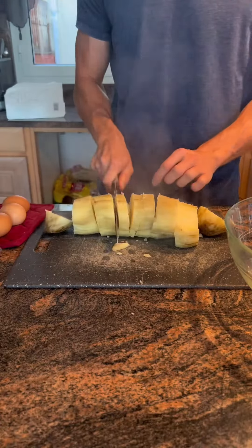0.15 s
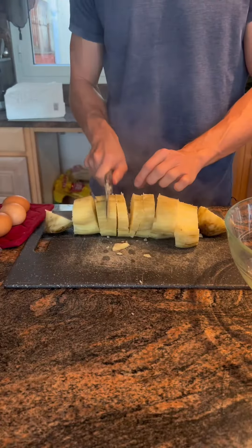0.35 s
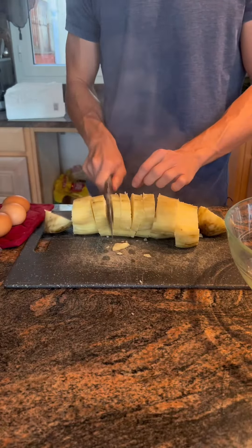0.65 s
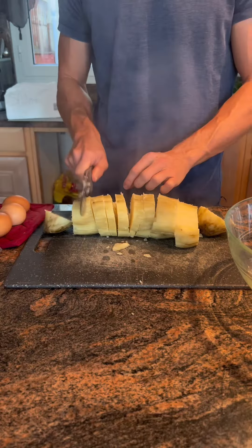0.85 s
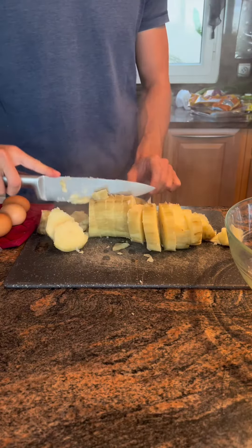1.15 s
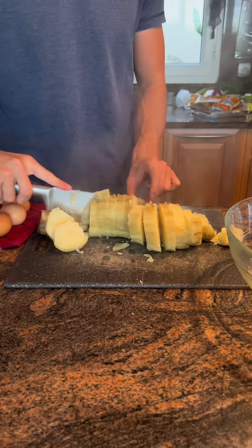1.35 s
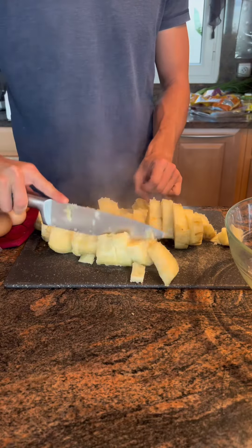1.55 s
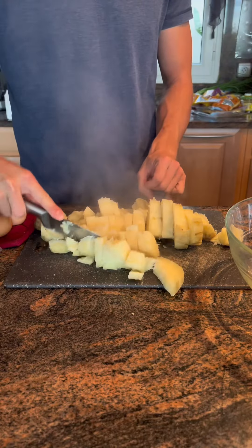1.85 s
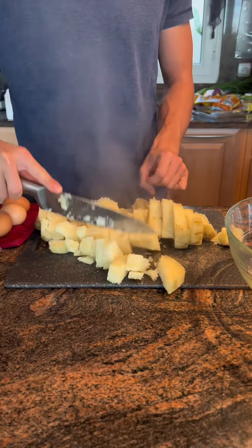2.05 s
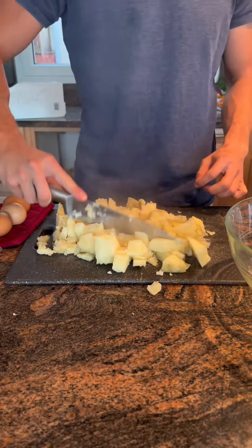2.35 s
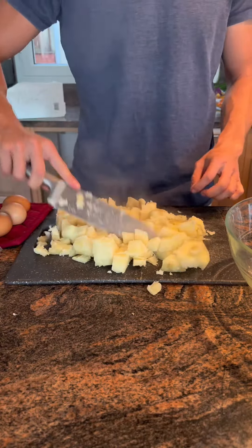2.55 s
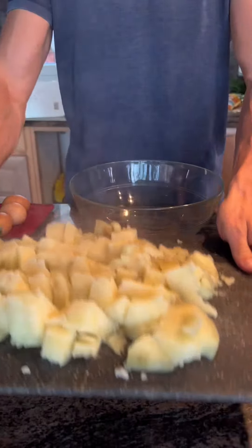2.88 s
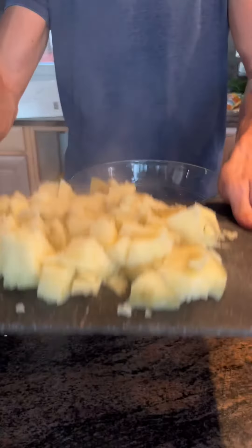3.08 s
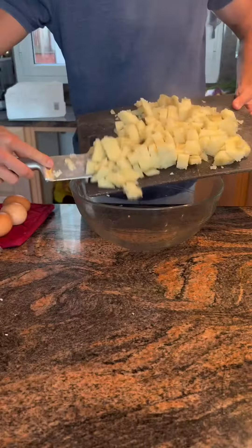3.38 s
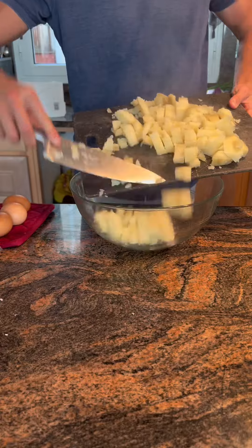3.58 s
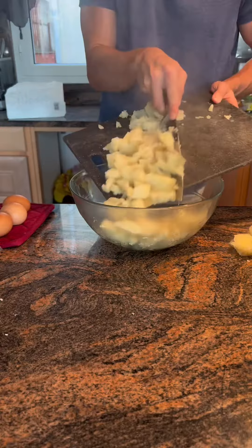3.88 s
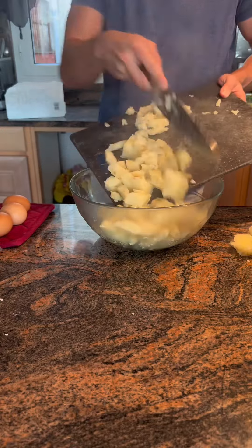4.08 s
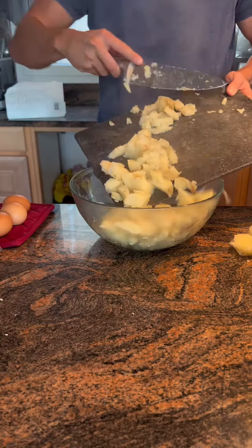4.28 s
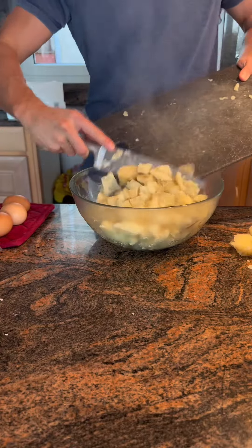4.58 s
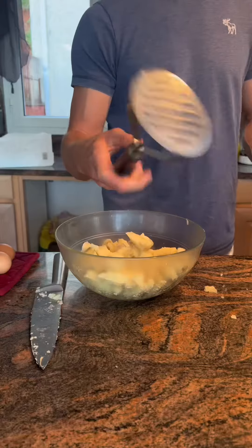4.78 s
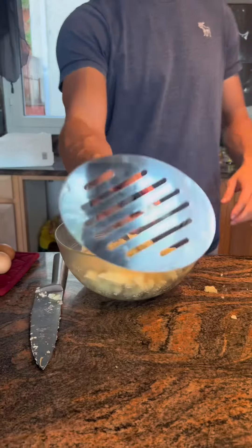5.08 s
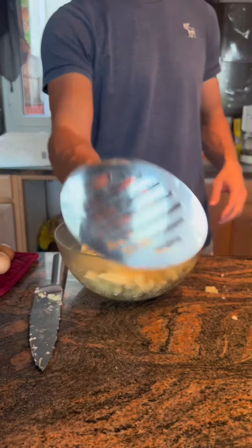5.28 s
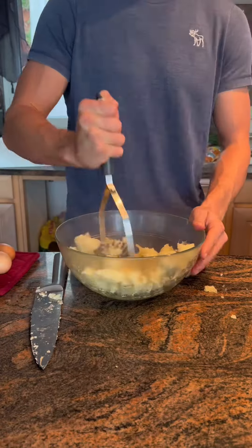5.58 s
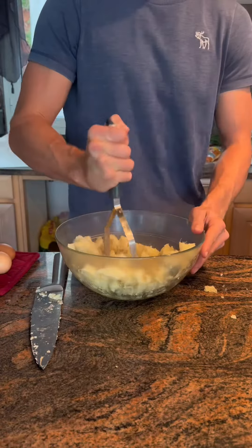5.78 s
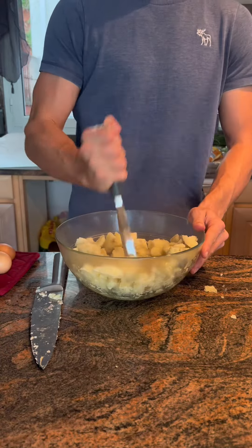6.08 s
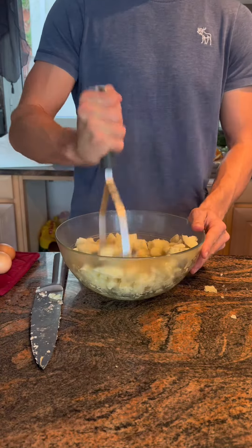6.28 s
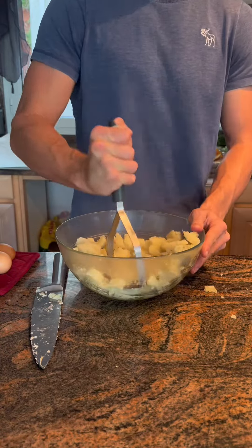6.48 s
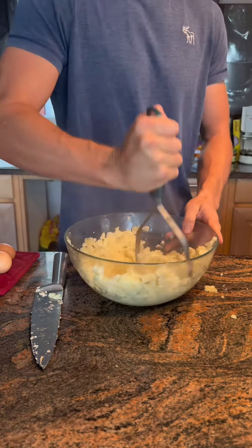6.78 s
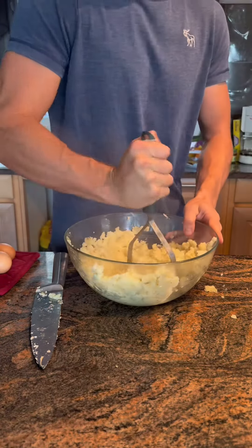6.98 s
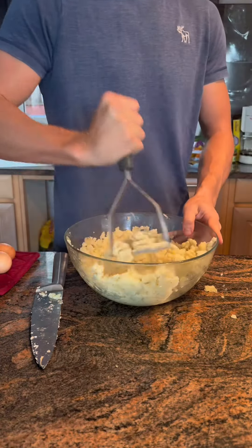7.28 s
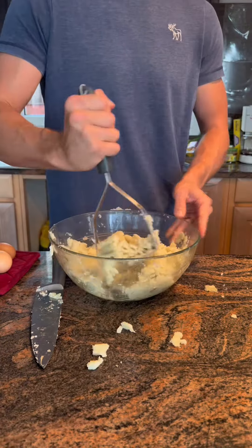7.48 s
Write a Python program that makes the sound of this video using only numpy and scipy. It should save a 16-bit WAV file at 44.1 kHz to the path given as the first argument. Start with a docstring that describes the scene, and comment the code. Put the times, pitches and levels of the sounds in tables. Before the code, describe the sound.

A close stereo take in a small reverberant kitchen, with a faint low appliance hum and very quiet air. Hard knife chops crack on a plastic board over a stone counter at 0.12 and 0.4 s, each preceded by a swelling moist crackle; a brief steel squeak follows near 0.55. A softer, duller chop lands at 0.93, then loud ones at 1.36 and 1.67. From 2.2 to 3.2 s only faint wet squashing and tiny ticks. At 3.3-3.45 the blade scrapes grittily, ringing steel and glass as soft lumps tumble; more drops at 3.7, another scrape and rim rub at 4.4, a short knock at 4.7. The masher clinks lightly at 4.84 and 5.48. Soft thuds come at 5.5-6.0, then firmer mashing knocks at 6.73 and 7.0, and bright, hard glass clanks at 7.32 and 7.52. Echoes stop abruptly at each jump.

```python
"""Potato mash on a stone counter

Cooked potato is chopped on a plastic board, scraped into a glass bowl and mashed in a kitchen, heard in stereo.
Struck modes make the knocks, thuds and rings; random grains make the scraping and the wet crackle.
Filtered noise makes squeaks, ticks, kitchen echoes and faint air; a wavering sine makes the low hum.
The action jumps ahead several times: at each jump every ring and echo stops dead."""
import sys
import numpy as np
from scipy import signal
from scipy.fft import rfft, irfft
from scipy.io import wavfile
from scipy.ndimage import uniform_filter1d

SR = 44100
rng = np.random.default_rng(int(sys.argv[2]) if len(sys.argv) > 2 else 0)


def int16_out(signal):
    """Quantize to a 16-bit WAV file."""
    q = np.round(np.clip(np.atleast_2d(signal).T, -1, 1) * 32767)
    wavfile.write(sys.argv[1], SR, q.astype(np.int16))


N = 337365

TIME = np.arange(N) / SR
HIT_TIME = np.arange(SR // 2) / SR
# a faint copy of each knock, of knife or bowl, sounds 8.5 ms ahead of it
EARLY_COPY_S, EARLY_COPY_DB = 0.0085, -24
SCRAPE_ATTACK_S, SCRAPE_SAG_DB_PER_S = 0.0045, 27
SCRAPE_RELEASE_S = 0.062  # time to fall 60 dB, on top of the sag


def undb(db):
    """Decibels to gain."""
    return 10 ** (np.asarray(db) / 20)


def lookup(points, hz):
    """Read (frequency, value) points on a log-frequency axis."""
    f, value = np.transpose(points)
    return np.interp(np.log(hz + 1), np.log(f), value)


def colour(x, points):
    """Causal minimum-phase filter with the given (Hz, dB) shape, built from its cepstrum."""
    size = 2048
    log_gain = np.log(undb(lookup(points, np.fft.rfftfreq(size, 1 / SR))))
    cepstrum = irfft(log_gain)
    # fold the cepstrum onto positive time so that nothing sounds early
    cepstrum[1:size // 2] *= 2
    cepstrum[size // 2 + 1:] = 0
    response = irfft(np.exp(rfft(cepstrum)))
    return signal.fftconvolve(x, response)[:len(x)]


def unit(x):
    """Scale to rms 1."""
    return x / np.sqrt(np.mean(x ** 2))


def blow(x, db):
    """Scale a hit so that its energy, spread over 10 ms, has this level."""
    return x * undb(db) * np.sqrt(SR / 10 / 10 / np.sum(x ** 2))


def fade(t60):
    """Exponential decay over the length of a hit; t60 [s] is the time to fall 60 dB."""
    return np.exp(-np.log(1000) * HIT_TIME / max(t60, 1e-4))


def burst(t60):
    """A decaying run of tiny contacts, as noise."""
    return rng.standard_normal(len(HIT_TIME)) * fade(t60)


def ring(modes, scatter):
    """Struck modes of alternating polarity; each blow lands elsewhere and detunes them a little."""
    detune = 1 + scatter * rng.standard_normal(len(modes))
    total = np.zeros(len(HIT_TIME))
    for k, (hz, db, t60) in enumerate(modes):
        # dividing by sqrt(t60) gives long and short modes comparable energy
        strength = (-1) ** k * undb(db) / np.sqrt(t60)
        total += strength * fade(t60) * np.cos(2 * np.pi * hz * detune[k] * HIT_TIME)
    return total


def cushion(x, hz):
    """A soft contact pushes for longer and takes away the treble above hz."""
    return signal.sosfilt(signal.butter(3, min(hz, SR / 2.2), fs=SR, output="sos"), x)


def resonance(x, hz, width_hz):
    """One band with steep skirts: the same resonance passed twice."""
    b, a = signal.iirpeak(hz, hz / min(width_hz, SR / 4), fs=SR)
    return signal.lfilter(b, a, signal.lfilter(b, a, x))


def grains(rate, spread_db):
    """Random clicks of very unequal size, rate a second on average."""
    happens = rng.random(N) < rate / SR
    size_db = spread_db * np.minimum(rng.exponential(size=N), 4)
    return happens * rng.standard_normal(N) * undb(size_db)


def walk(rate):
    """Slow chance of rms near 1, with about rate new values a second."""
    k = int(SR / rate)
    steps = np.repeat(rng.standard_normal(N // k + 1), k)
    return unit(uniform_filter1d(steps, k)[:N])


# jumps in the action: (time [s], length of the hush [s])
ACTION_JUMPS = [(0.253, 0.0027), (0.723, 0.013), (1.015, 0.0066), (1.483, 0.006), (2.118, 0.0095),
                (2.727, 0.0046), (3.274, 0.001), (3.707, 0.0012), (4.359, 0.0017), (4.751, 0.006),
                (5.526, 0.001), (6.699, 0.017), (7.429, 0.0017)]
EDGES = [0] + [int(s * SR) for s, _ in ACTION_JUMPS] + [N]


def add(track, s, sound):
    """Lay a sound in at s [s]; it lasts until the next jump at most."""
    start = int(s * SR)
    stop = min(start + len(sound), min(e for e in EDGES if e > start))
    track[start:stop] += sound[:stop - start]


def resound(x, response):
    """Let each stretch between jumps ring on its own."""
    stretches = [signal.fftconvolve(x[a:b], response)[:b - a] for a, b in zip(EDGES, EDGES[1:])]
    return np.concatenate(stretches)


def strokes(rows, attack_s, sag_db_per_s, release_s):
    """Gain over time of hand strokes: each takes hold, eases off while it lasts and dies away."""
    gain = np.zeros(N)
    t = TIME[:SR]
    for s, length, db in rows:
        held = np.minimum(t / attack_s, 1) * undb(db - sag_db_per_s * t)
        release = np.exp(-np.log(1000) * np.maximum(t - length, 0) / release_s)
        add(gain, s, held * release)
    return gain


# spectrum shape of the quiet kitchen air: (frequency [Hz], relative level [dB])
KITCHEN_AIR = [(47, -29.5), (80, -7), (109, -13), (184, -7), (255, -15), (347, -12), (413, -20),
               (641, -28.5), (1410, -34), (1750, -26.5), (3460, -47), (7440, -46.5), (9680, -55),
               (11500, -49.5), (15000, -84.5)]


def background():
    """A wavering appliance hum, a sine of drifting pitch and level, over faint, steady air noise."""
    hum_hz = 56.8 + 1.8 * walk(3.1)
    hum_swell = undb(0.5 * walk(5.5))
    hum = np.sin(2 * np.pi * np.cumsum(hum_hz) / SR) * hum_swell
    air, side = (unit(colour(rng.standard_normal(N), KITCHEN_AIR)) * undb(-59) for _ in range(2))
    return unit(hum) * undb(-52.5) + air + np.outer([1, -1], side) * undb(-13)


def slicing():
    """Gain over time of the cuts: crackle grows as the blade sinks in, until the edge meets the board."""
    slice_s, swell_db_per_s = 0.135, 72.5
    gain = np.zeros(N)
    for s, *_, db in KNIFE_CHOPS:
        cutting = (TIME > s - slice_s) & (TIME < s)
        gain[cutting] += undb(db - swell_db_per_s * (s - TIME[cutting]))
    return uniform_filter1d(gain, SR // 100)


# potato pushed together, lifted or pressed under the masher: (time [s], length [s], relative level [dB])
POTATO_PRESSES = [(2.23, 0.063, -59), (2.3, .03, -54.5), (2.733, .06, -60), (2.835, 0.021, -68.5),
                  (2.945, 0.12, -59.5), (3.08, 0.027, -58.5), (4.765, .08, -64), (4.96, 0.1, -73),
                  (5.368, .12, -64.5), (5.53, .25, -68), (5.8, .09, -63), (5.91, 0.11, -70.5),
                  (6.25, 0.47, -65), (6.735, 0.025, -48), (6.8, 0.12, -59.5), (6.94, 0.078, -57),
                  (7.435, 0.052, -64.5)]
# spectrum shape of wet flesh: (frequency [Hz], relative level [dB])
WET_FLESH = [(200, -5.5), (600, 2.5), (1500, -1.5), (3200, 0), (4800, -4), (7500, -4), (11000, -6),
             (13000, -7.5), (16000, -27.5)]


def squashing():
    """Moist flesh parts in a fine crackle of bursting films, random clicks that follow the hand's effort."""
    presses = strokes(POTATO_PRESSES, attack_s=0.0084, sag_db_per_s=10.5, release_s=0.21)
    effort = slicing() + presses
    return unit(colour(grains(4200, 1), WET_FLESH)) * effort * undb(-1.0)


# knife through potato to the board: (time [s], knock level [dB], contact cutoff [Hz],
# crack re board ring [dB], thud level [dB], blade slap level [dB],
# extra on the board's lowest mode [dB], send to the room [dB], relative crackle level at the board [dB])
KNIFE_CHOPS = [(0.1199, -11, 7500, -3.5, -20, -25, -7, -2, -49.5),
               (0.3951, -11, 7870, -0.5, -19.5, -22.5, -12.5, 0.5, -52),
               (0.927, -23, 2200, -1, -29.5, -70, 3, -1.5, -55),
               (1.36, -11, 7000, -2.5, -20.5, -23.5, 5, -4, -56.5),
               (1.6691, -9, 6500, -0.5, -16, -26, 8.5, -5.5, -51.5)]
# ringing modes of the plastic board: (frequency [Hz], relative level [dB], t60 [s])
BOARD_MODES = [(573, -9, 0.083), (680, -1, 0.091), (774, -3.5, 0.074), (833, -2, 0.13), (880, -5, 0.007),
               (1204, 0, 0.017), (1590, -11, 0.045), (1904, -5.5, 0.0097), (2220, -12.5, 0.005),
               (2890, -8, 0.014), (2973, -11, .012), (3320, -16, 0.0055)]
# low modes of the stone counter: (frequency [Hz], relative level [dB], t60 [s])
COUNTER_MODES = [(133, -10.5, 0.13), (173, -13, 0.16), (250.6, -4.5, 0.11), (303, -3, 0.051),
                 (353.5, 3.5, 0.034), (442, -1, 0.027), (503, -0.5, 0.02)]
# spectrum shape of a hard crack: (frequency [Hz], relative level [dB])
CRACK_COLOUR = [(100, -27), (400, -4), (900, 8), (1500, 4.5), (2900, 1.5), (4200, -4.5), (7000, -9),
                (11000, -10), (13000, -26.5), (16000, -33)]
# spectrum shape of the blade's slap: (frequency [Hz], relative level [dB])
SLAP_COLOUR = [(500, -21), (2000, -11.5), (4500, -8), (7000, -1), (10000, -10), (12500, -9), (16000, -27)]


def knife():
    """A faint copy of the knock comes first, then the edge knocks board onto counter and the heel slaps down."""
    direct, to_room = np.zeros(N), np.zeros(N)
    slap_lag_s = 0.0024
    # hard steel on hard plastic: one clean impulse with a little grit behind it
    impulse = colour(signal.unit_impulse(len(HIT_TIME)), CRACK_COLOUR)
    low_hz, low_db, low_t60 = BOARD_MODES[0]
    for s, db, contact_hz, crack_db, thud_db, slap_db, flex_db, room_db, _ in KNIFE_CHOPS:
        # where the edge lands decides how much the whole board flexes
        modes = [(low_hz, low_db + flex_db, low_t60)] + list(BOARD_MODES[1:])
        grit = blow(colour(burst(0.06), CRACK_COLOUR), -7.5)
        body = blow(ring(modes, 0.018), 0) + blow(impulse, crack_db) + grit
        knock = blow(cushion(body, contact_hz), db)
        thud = blow(cushion(ring(COUNTER_MODES, 0.004), 1000), thud_db)
        slap = blow(colour(burst(0.0095), SLAP_COLOUR), slap_db)
        early_copy = knock * undb(EARLY_COPY_DB)
        for when, sound in [(s - EARLY_COPY_S, early_copy), (s, knock + thud), (s + slap_lag_s, slap)]:
            add(direct, when, sound)
            add(to_room, when, sound * undb(room_db))
    return direct, to_room


# echo decay in the kitchen: (frequency [Hz], t60 [s])
KITCHEN_T60 = [(100, 0.87), (300, 0.34), (800, 0.48), (2000, 0.42), (5000, .38), (9000, 0.32),
               (15000, 0.27)]


def room_response(shape):
    """Diffuse kitchen echoes: noise that builds up in a few ms and decays at its own rate in each band."""
    noise = rng.standard_normal(len(HIT_TIME))
    hz, s, frames = signal.stft(noise, SR, nperseg=256)
    decay = np.exp(-np.log(1000) * s / lookup(KITCHEN_T60, hz)[:, None])
    tail = signal.istft(frames * decay, SR)[1][:len(HIT_TIME)]
    tail = tail * np.clip((HIT_TIME - 0.004) / 0.0033, 0, 1)
    return colour(tail / np.linalg.norm(tail), shape)


# steel squeaking through potato:
# (time [s], length [s], centre [Hz], width of each filter pass [Hz], relative level [dB])
STEEL_SQUEAKS = [(0.543, 0.12, 2120, 356, -52.5), (0.556, 0.089, 3180, 900, -49.5),
                 (6.247, 0.22, 3700, 160, -73), (7.458, 0.062, 2140, 130, -56.5)]


def squeaks():
    """Uneven stick-slip, as noise gathered around one pitch, swells and lets go."""
    out = np.zeros(N)
    for s, length, hz, width_hz, db in STEEL_SQUEAKS:
        swell = np.sin(np.pi * np.minimum(HIT_TIME / length, 1))
        slip = unit(resonance(rng.standard_normal(len(HIT_TIME)), hz, width_hz))
        add(out, s, slip * swell * undb(db))
    return out


# small ticks of steel and wet flesh:
# (time [s], level [dB], centre [Hz], width of each filter pass [Hz], t60 of the noise [s])
SMALL_TICKS = [(1.602, -56, 5750, 5000, 0.012), (2.824, -44.5, 5300, 6150, 0.031),
               (3.129, -42, 1716, 1930, 0.016), (3.163, -55.5, 2150, 2450, 0.014),
               (3.271, -48.5, 2230, 6200, 0.012), (6.7257, -39, 5900, 5750, 0.07),
               (6.983, -46, 6800, 8000, 0.058), (7.3218, -21.5, 5300, 5400, 0.0068),
               (7.5218, -26, 4760, 5460, 0.14)]


def ticks():
    """Brief contacts, each a noise burst through one broad resonance."""
    out = np.zeros(N)
    for s, db, hz, width_hz, t60 in SMALL_TICKS:
        add(out, s, blow(resonance(burst(t60), hz, width_hz), db))
    return out


# the blade pushes across the board over the bowl: (time [s], length [s], relative level [dB])
BLADE_SCRAPES = [(3.28, 0.052, -43), (3.338, 0.042, -35.5), (3.434, .012, -34), (3.715, .09, -56),
                 (3.96, 0.1, -66), (4.364, 0.039, -36), (4.48, 0.22, -63), (4.69, .02, -39)]
# soft lumps drop or shift in the bowl: (time [s], length [s], relative level [dB])
LUMP_TUMBLES = [(3.283, 0.078, -32.5), (3.44, 0.013, -47), (3.56, 0.049, -54), (3.635, 0.016, -52),
                (3.716, 0.089, -39.5), (3.95, 0.19, -61), (4.37, 0.24, -42.5), (4.62, .06, -54),
                (5.532, 0.058, -45.5), (6.255, 0.031, -54.5)]
# ringing modes of the knife blade: (frequency [Hz], relative level [dB], t60 [s])
BLADE_MODES = [(1620, 4, 0.043), (2720, 0.5, 0.057), (2940, 2.5, 0.075), (3770, 3, 0.062), (6100, 0, 0.053),
               (6470, -6.5, 0.047), (6620, 2.5, 0.077), (6600, -25, 0.083), (7340, -10, 0.088),
               (7580, 3, 0.045), (8670, -13, 0.16), (8740, -29, .12), (9900, -32, .06), (12630, -20, 0.12)]
# spectrum shape of the rough board under the edge: (frequency [Hz], relative level [dB])
GRIT_COLOUR = [(300, -23), (1000, 2), (3000, 8.5), (4800, 2.5), (7000, 3.5), (11000, 0.5), (13000, 4),
               (16000, -37)]
# spectrum shape of tumbling lumps: (frequency [Hz], relative level [dB])
TUMBLE_COLOUR = [(100, -21), (250, -7), (420, 4.5), (560, 2), (900, -6.5), (1300, -14.5), (2500, -18),
                 (8000, -35)]


def sweeping():
    """The edge catches and slips in spurts on the rough board, ringing blade and bowl; soft lumps tumble in."""
    push = strokes(BLADE_SCRAPES, SCRAPE_ATTACK_S, SCRAPE_SAG_DB_PER_S, SCRAPE_RELEASE_S)
    spurts = undb(3 * walk(90))
    slips = unit(grains(2000, 1.5) * spurts) * push
    tumbling = strokes(LUMP_TUMBLES, attack_s=0.0029, sag_db_per_s=19.5, release_s=0.074)
    lumps = unit(colour(grains(700, 0.5), TUMBLE_COLOUR)) * tumbling
    grit = blow(colour(burst(0.048), GRIT_COLOUR), -0.19)
    blade = blow(ring(BLADE_MODES, 0.0011), -2.7)
    glass = blow(ring(GLASS_MODES, 0.00065), -6.5)
    body = grit + blade + glass
    return resound(slips, body / np.linalg.norm(body)) * undb(-4.0) + lumps * undb(-5.5)


# blows on the bowl, most of them cushioned by potato: (time [s], knock level [dB],
# contact cutoff [Hz], crush t60 [s], thud level [dB], glass ring level [dB])
BOWL_KNOCKS = [(3.340, -44, 9100, 0.022, -50, -34), (3.438, -49, 9000, .03, -33.5, -52),
               (3.541, -36, 1670, 0.018, -36, -72), (4.380, -44.5, 3020, 0.098, -36, -47),
               (4.6904, -32.5, 2740, 0.043, -32.5, -34.5), (5.539, -36, 1180, 0.37, -39, -45),
               (5.8451, -37, 1448, 0.083, -30, -46.5), (6.012, -55.5, 990, 0.038, -43.5, -73),
               (6.7266, -17, 1970, 0.044, -28, -40), (6.768, -26.5, 1330, 0.023, -30.5, -53),
               (6.994, -29.5, 1290, .035, -32.5, -50), (7.3218, -16, 12500, 0.018, -30, -26),
               (7.349, -31.5, 1600, .035, -30, -52), (7.5208, -20.5, 11500, 0.033, -49, -20.5),
               (7.526, -19.5, 1240, 0.016, -25, -54)]
# modes of the potato-filled bowl: (frequency [Hz], relative level [dB], t60 [s])
FULL_BOWL_MODES = [(557, -9.5, 0.012), (705, 1.5, 0.083), (876, 2.5, 0.019), (1059, -5.5, 0.062),
                   (1164, -1, 0.046), (1400, -10, 0.0046), (1542, -14.5, 0.19), (2245, -24, 0.042),
                   (2230, -9.5, 0.041)]
# low modes of the mash: (frequency [Hz], relative level [dB], t60 [s])
MASH_MODES = [(116, -12.5, 0.24), (172.5, -10.5, 0.17), (291, -8.5, 0.12), (337, -6, 0.17),
              (391.5, 0, 0.023), (490, -4.5, 0.096), (591, -11, 0.09)]
# ringing modes of the glass: (frequency [Hz], relative level [dB], t60 [s])
GLASS_MODES = [(404, -2, 0.56), (889, 8.5, 0.093), (1497, -1.5, 0.13), (2303, 0, 0.27), (3130, 5, 0.071),
               (4130, -1, 0.13), (5310, 0.5, 0.14), (6500, 3, 0.063), (7840, 1.5, 0.038), (9430, -5, 0.16)]


def bowl():
    """Each blow knocks the loaded bowl, thuds through the potato and leaves the glass rim ringing."""
    out = np.zeros(N)
    for s, db, contact_hz, crush_t60, thud_db, ring_db in BOWL_KNOCKS:
        crush = blow(colour(burst(crush_t60), CRACK_COLOUR), 3.0)
        body = blow(ring(FULL_BOWL_MODES, 0.042), 0) + crush
        knock = blow(cushion(body, contact_hz), db)
        thud = blow(cushion(ring(MASH_MODES, 0.039), 900), thud_db)
        rim = blow(cushion(ring(GLASS_MODES, 0.0021), contact_hz), ring_db)
        add(out, s - EARLY_COPY_S, knock * undb(EARLY_COPY_DB))
        add(out, s, knock + thud + rim)
    return out


# the board drags on the glass rim and makes it sing: (time [s], length [s], relative level [dB])
BOARD_RIM_RUBS = [(4.38, 0.047, -44.5), (4.5, 0.082, -48.5)]
# what the soft contact passes on to the glass: (frequency [Hz], relative level [dB])
RIM_CONTACT_COLOUR = [(400, -3.5), (900, -13.5), (1500, -9.5), (2300, -10), (3200, -28), (5200, -20),
                      (9000, -31)]


def rim_rubbing():
    """The plastic board judders along the rim; the soft contact wakes mostly the low glass modes."""
    drag = strokes(BOARD_RIM_RUBS, SCRAPE_ATTACK_S, SCRAPE_SAG_DB_PER_S, SCRAPE_RELEASE_S)
    judder = unit(grains(830, 1.2)) * drag
    rim = colour(ring(GLASS_MODES, 0.00052), RIM_CONTACT_COLOUR)
    return resound(judder, rim / np.linalg.norm(rim))


# the steel masher is picked up and turned in the hand: (time [s], rattle level [dB], ring level [dB])
MASHER_CLINKS = [(4.807, -73, -61), (4.838, -49, -47.5), (5.439, -61, -71), (5.477, -47.5, -54.5),
                 (5.531, -70, -68)]
# ringing modes of the masher's wire: (frequency [Hz], relative level [dB], t60 [s])
MASHER_MODES = [(2500, -4.5, 0.15), (3110, 3, 0.07), (3580, -16, .2), (4500, -18, 0.23), (5640, -6.5, 0.17),
                (6240, -6, 0.092), (7600, 2, 0.13)]


def masher():
    """The wire frame rattles in its handle, a broad noise burst, and rings briefly."""
    out = np.zeros(N)
    for s, rattle_db, ring_db in MASHER_CLINKS:
        rattle = resonance(burst(0.11), hz=7370, width_hz=7500)
        add(out, s, blow(rattle, rattle_db) + blow(ring(MASHER_MODES, 0.00091), ring_db))
    return out


# echo spectrum common to both channels: (frequency [Hz], relative level [dB])
ROOM_MID = [(80, -11), (190, -2), (280, -3.5), (450, -4.5), (750, -3.5), (1300, -9), (2500, -8.5),
            (5000, -7), (9000, -5.5), (15000, 1)]
# echo spectrum of opposite sign left and right: (frequency [Hz], relative level [dB])
ROOM_WIDTH = [(100, -31), (400, -17.5), (750, -5.5), (1200, -15.5), (4000, -12.5), (14000, -21.5)]


def scene():
    """All the handling, its kitchen echoes and the background, with a brief hush at each jump."""
    chops, chop_send = knife()
    knocks = bowl()
    clicks = ticks() + masher()
    rubbing = sweeping() + rim_rubbing() + squashing() + squeaks()
    send = chop_send + knocks * undb(-0.5) + clicks * undb(-3.0) + rubbing * undb(3.0)
    mid = chops + knocks + clicks + rubbing + resound(send, room_response(ROOM_MID)) * undb(-1)
    side = resound(send, room_response(ROOM_WIDTH))
    handling = mid + np.outer([1, -1], side)
    hush = np.ones(N)
    for s, gap in ACTION_JUMPS:
        hush[int(s * SR):int((s + gap) * SR)] = undb(-26.5)
    return (handling + background()) * uniform_filter1d(hush, SR // 1000)


# level between the microphone ports: (frequency [Hz], left minus right [dB])
PORT_LEVELS = [(110, 0), (400, -1), (700, -1.3), (1300, -.7), (4400, .8), (8000, 0)]
# phase between the microphone ports: (frequency [Hz], lead of the right port [rad])
PORT_PHASES = [(1300, 0), (4000, .3), (5000, .7), (7500, .45), (9000, 1.05), (11500, 2.3), (12300, 3)]


def record(dry):
    """Two microphone ports differ in level and treble phase; peaks are rounded and the top is cut at 16 kHz."""
    hz = np.fft.rfftfreq(N, 1 / SR)
    half = np.array([[0.5], [-0.5]])  # left and right share each difference
    tilt = undb(half * lookup(PORT_LEVELS, hz))
    turn = np.exp(-1j * half * lookup(PORT_PHASES, hz))
    ports = irfft(rfft(dry) * tilt * turn, N)
    rounded = np.tanh(1.186 * ports) / 1.113
    return signal.sosfilt(signal.ellip(8, 0.2, 70, 16000, fs=SR, output="sos"), rounded)


dry = scene()
out = record(dry)
int16_out(out)
```